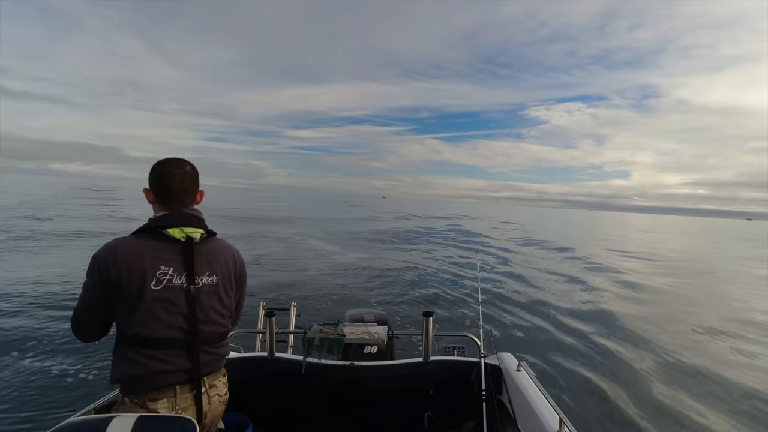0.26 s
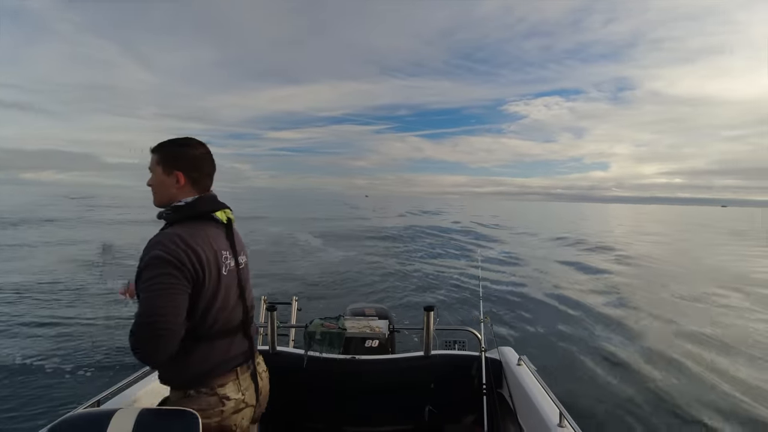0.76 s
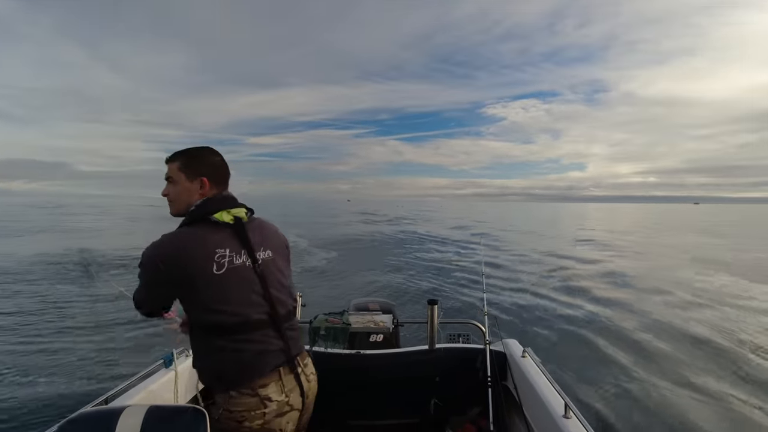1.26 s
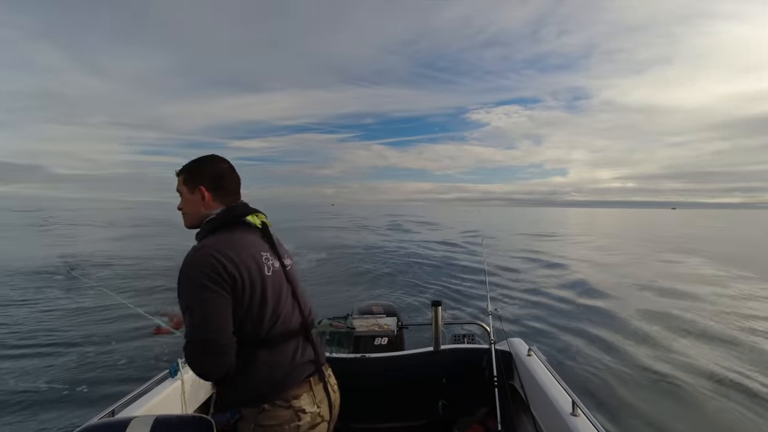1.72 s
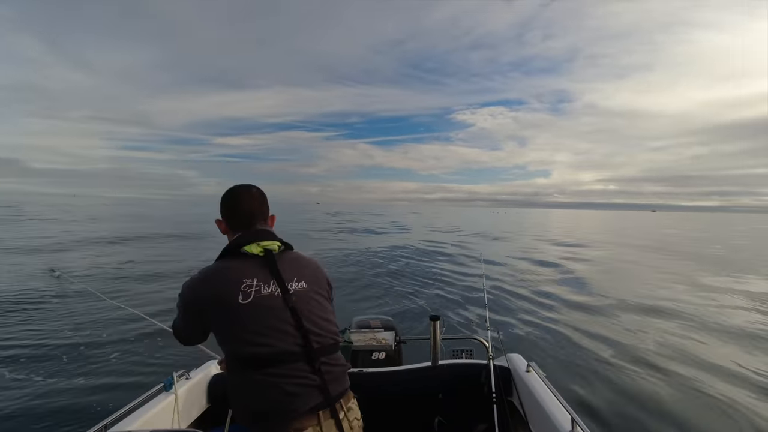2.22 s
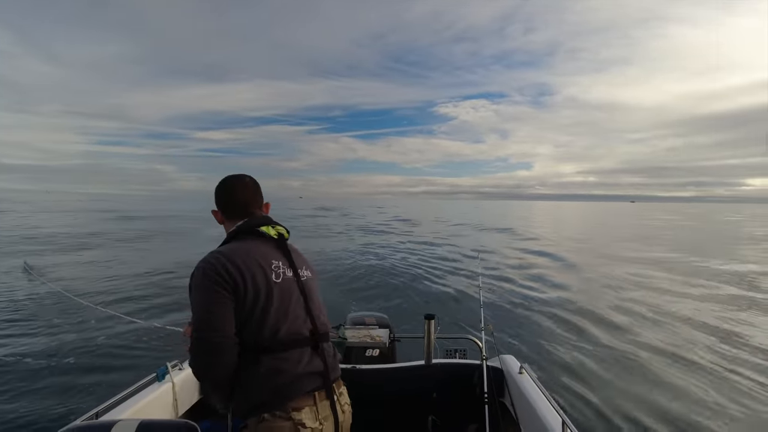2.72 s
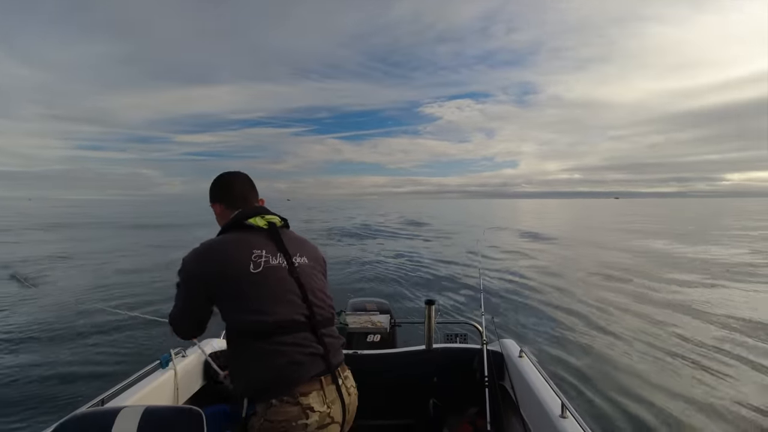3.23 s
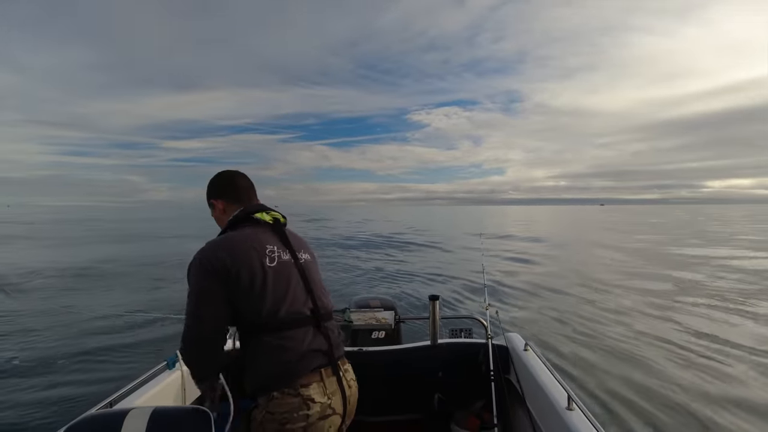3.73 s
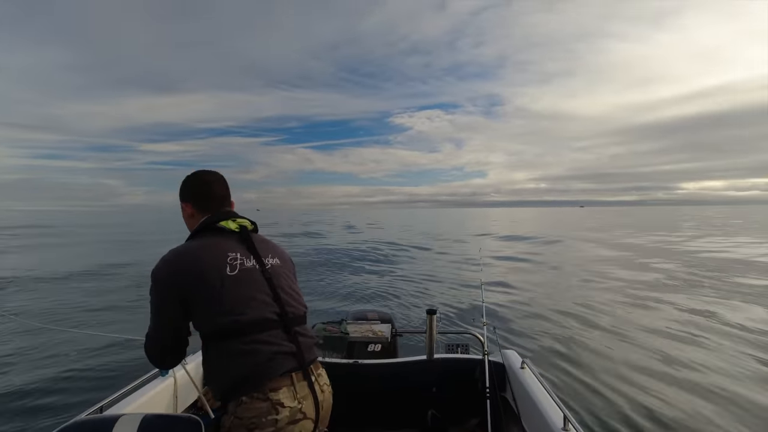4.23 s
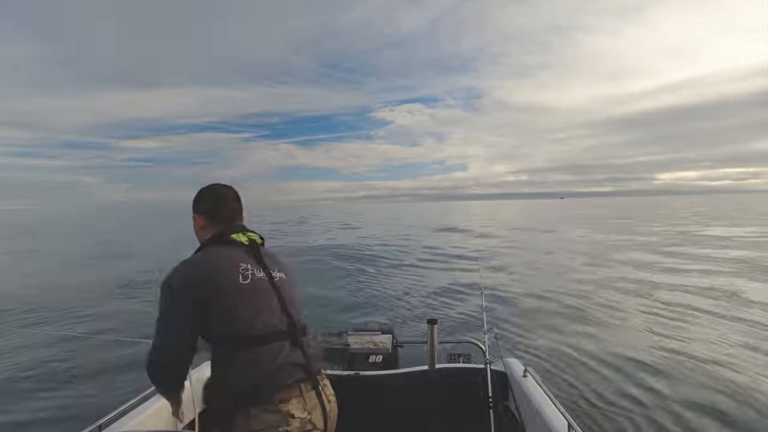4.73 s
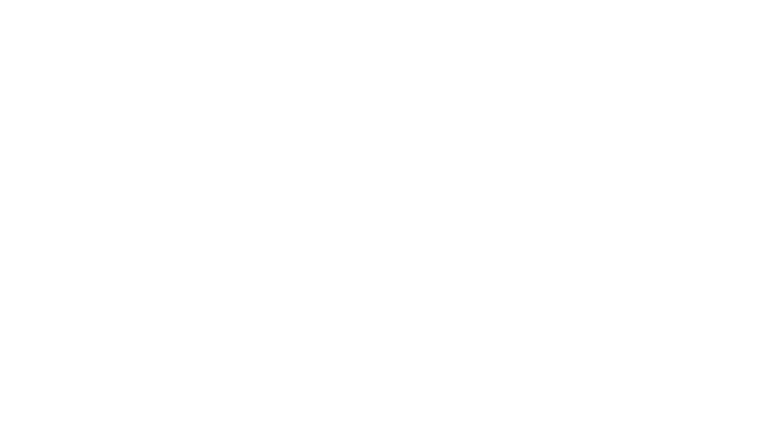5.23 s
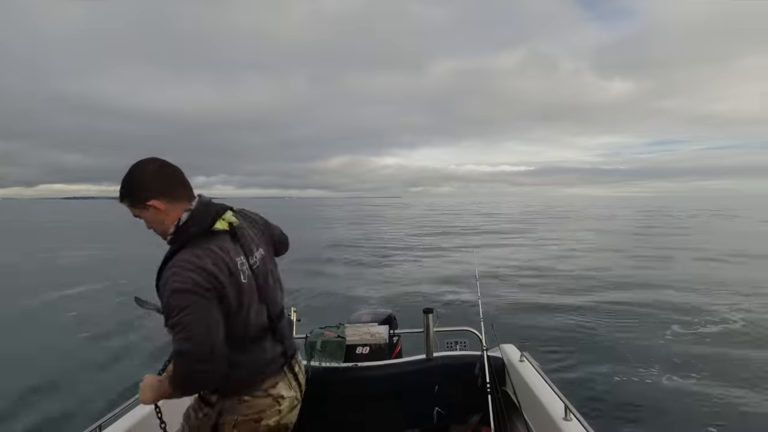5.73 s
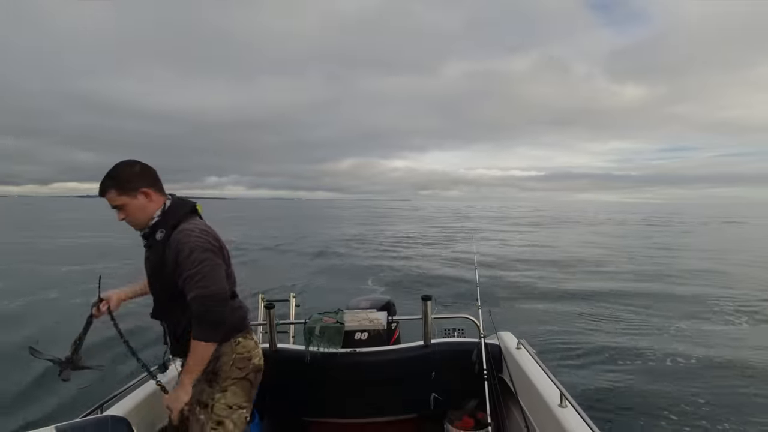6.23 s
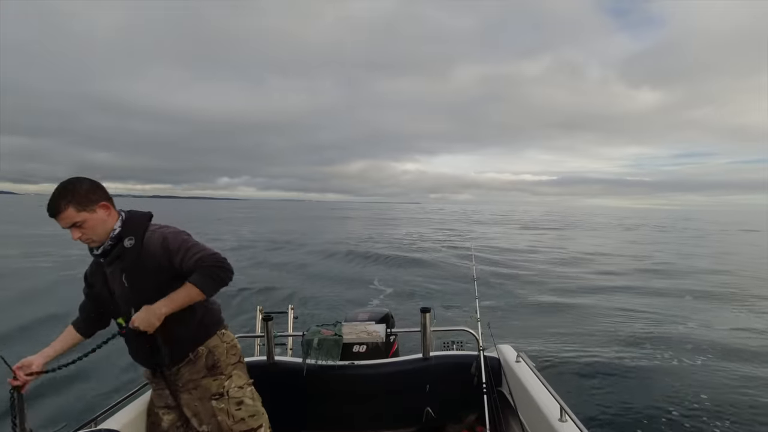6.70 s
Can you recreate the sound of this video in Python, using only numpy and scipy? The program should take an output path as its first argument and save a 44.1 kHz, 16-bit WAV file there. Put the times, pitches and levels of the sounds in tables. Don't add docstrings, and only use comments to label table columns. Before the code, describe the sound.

Hollow thumps of wet rope coils against a small boat's hull, then an anchor chain rattles, grinds and clinks over the gunwale on calm water.

```python
import sys
import numpy as np
from scipy import signal
from scipy.fft import rfft, irfft, next_fast_len
from scipy.io import wavfile
from scipy.ndimage import uniform_filter1d, map_coordinates

SR = 44100
rng = np.random.default_rng(int(sys.argv[2]) if len(sys.argv) > 2 else 0)


def invert_db(x):
    u = np.asarray(x, float) / 20
    return 10 ** u


def wrap_up_sound(samples):
    columns = np.atleast_2d(samples).T
    tamed = np.clip(columns, -1, 1)
    steps = np.round(tamed * 32767).astype(np.int16)
    wavfile.write(sys.argv[1], SR, steps)


N = 306936
SPAN = SR // 6
FIRST_CONTACT = 15.5

# pitch in Hz, level in dB, time to fall by 60 dB in seconds.
LINK_MODES = [
    [(2830, -10, .08), (3144, -3, .15), (3786, 0, .2), (4370, -4, .1)],
    [(5443, -10, .09), (5655, 0, .25)],
    [(6490, -3, .15), (6530, -2, .2)],
    [(8640, -8, .1), (8745, -1, .14), (9668, -5, .12), (9973, -3, .15), (10810, -5, .12), (11600, -6, .12)],
    [(13250, -6, .1), (13440, -1, .2), (13880, 0, .15), (14930, -5, .1), (15250, -10, .08)],
]

# pitch in Hz, width in Hz, level in dB.
GUNWALE_PEAKS = [(383, 44, -4), (689, 10, 1), (852, 44, -2.5), (975, 40, -3.5), (1205, 23, -1.5),
                 (1340, 25, -6.5), (1460, 25, -1.5), (1708, 39, -1.5), (1897, 50, -2.5), (2263, 68, -9.5),
                 (2450, 80, -9), (2790, 87, -11)]


def unit(x):
    return x / np.sqrt(np.mean(x ** 2) + 1e-20)


def level_curve(rows):
    s, db = np.transpose(rows)
    return np.interp(np.arange(N) / SR, s, db, left=-120)


def wobble(rate):
    knots = rng.standard_normal(int(N * rate / SR) + 4)
    return map_coordinates(knots, [np.arange(N) * rate / SR])


def shaped(x, response):
    m = next_fast_len(len(x) + 2048)
    return irfft(rfft(x, m) * response(np.fft.rfftfreq(m, 1 / SR)), m)[:len(x)]


def colour(points):
    f, db = np.transpose(points)
    return lambda hz: invert_db(np.interp(np.log(hz + 1), np.log(f), db))


def band(centre_hz, width_hz):
    return lambda f: 1j * f * width_hz / (centre_hz ** 2 - f * f + 1j * f * width_hz)


def steep(centre_hz, width_hz):
    top = centre_hz + width_hz / 2

    def response(f):
        lowpass = top * top / (top * top - f * f + np.sqrt(2) * 1j * f * top)
        return (band(centre_hz, width_hz)(f) * lowpass) ** 2
    return response


def grit(rate, spread_db):
    return unit(rng.standard_normal(N) * invert_db(spread_db * wobble(rate)))


def burst(t60, rise):
    t = np.arange(SPAN) / SR
    contact_db = 3 * rng.standard_normal(SPAN // 90 + 1)
    lumps = invert_db(np.repeat(contact_db, 90)[:SPAN])
    fade = invert_db(-60 * (t / max(t60, .004)) ** 1.477)
    return lumps * rng.standard_normal(SPAN) * fade * (1 - np.exp(-t / rise))


def puff(t60, rise, response, strike=0):
    blow = burst(t60, rise)
    blow[SR // 1000] += strike
    x = shaped(blow, response)
    return x / np.abs(x).max()


def ring(hz, db, t60, rise, chatter_db):
    t = np.arange(SPAN) / SR
    phase = rng.uniform(0, 2 * np.pi, len(hz))[:, None]
    knots = rng.standard_normal((len(hz), SPAN // 300 + 2))
    waver = uniform_filter1d(np.repeat(knots, 300, axis=1), 200, axis=1)[:, :SPAN]
    level = invert_db(db[:, None] - 60 * t / t60[:, None] + chatter_db * waver)
    tones = level * np.sin(2 * np.pi * hz[:, None] * t + phase)
    return tones.sum(0) * (1 - np.exp(-t / rise))


def add(track, s, sound):
    track[round(s * SR):][:len(sound)] += sound


def lapping_sea():
    # pitch in Hz, level in dB.
    sea_colour = [(15, -3.5), (25, 5.5), (104, -9.5), (144, -6.5), (241, -8), (291, -16.5), (381, -11),
                  (709, -15), (1280, -21.5), (1550, -22), (1730, -23.5), (8710, -41.5), (15800, -47)]
    cells = signal.stft(rng.standard_normal(N), nperseg=512)[2]
    patches = uniform_filter1d(uniform_filter1d(rng.standard_normal(cells.shape), 8, 0), 6, 1)
    lap = signal.istft(cells * invert_db(1.7 * unit(patches)), nperseg=512)[1][:N]
    return invert_db(-51 + .9 * wobble(3)) * unit(shaped(lap, colour(sea_colour)))


def outboard():
    # pitch in Hz, width in Hz, level in dB.
    hums = [(99.87, 1.46, -58.5), (204, 19, -82), (293.2, 5, -60.5), (460, 54, -66.5), (514, 4.9, -70.5)]

    def response(f):
        return sum(invert_db(db) * band(hz, w)(f) * np.sqrt(SR / np.pi / w) for hz, w, db in hums)
    return shaped(rng.standard_normal(N), response)


def sway_and_shudder():
    # time in seconds, sway in dB, length of the swing in seconds, shudder in dB.
    jolt_rows = [
        (1.052, -31.5, .2, -48),
        (1.27, -36.5, .1, -37.5),
        (1.403, -41.5, .17, -51),
        (2.69, -47, .1, -74),
        (3.14, -48, .2, -57),
        (5.375, -31, .6, -34.5),
        (6.004, -32.5, .2, -32),
        (6.226, -24.5, .7, -34.5),
        (6.365, -24, .2, -34.5),
        (6.578, -30, .3, -34.5),
    ]
    s, sway_db, lasts, shudder_db = np.transpose(jolt_rows)[:, :, None]
    t = np.arange(N) / SR - s
    sag_db = 9.5 * np.abs(t) + 144 * np.clip(t - lasts, 0, None)
    swing = (invert_db(sway_db - sag_db) * np.clip(t / 0.04 + 1, 0, 1)).max(0)
    sway = np.sqrt(2) * swing * np.sin(2 * np.pi * 10.45 * np.arange(N) / SR)
    shake = invert_db(-59) + (invert_db(shudder_db) * np.exp(-.5 * (t / 0.026) ** 2)).sum(0)
    return sway + shake * unit(shaped(rng.standard_normal(N), steep(31.8, 43)))


def rope():
    # middle in seconds, level in dB, half length in seconds, centre in Hz.
    strokes = [(0.517, -46.5, 0.022, 2720), (0.519, -44.5, 0.02, 920), (0.719, -46, 0.022, 1950),
               (1.148, -55, 0.013, 2780), (1.196, -75, 0.013, 2580), (1.47, -59.5, 0.0052, 2600),
               (1.576, -52.5, 0.029, 3270), (2.097, -55.5, 0.031, 2700), (2.221, -53, 0.0056, 1650),
               (2.366, -66, 0.012, 2980), (2.949, -58.5, 0.023, 2270), (3.3, -59.5, 0.22, 2260),
               (3.878, -62, 0.02, 3220), (4.103, -58.5, 0.021, 2800), (4.242, -59, 0.012, 2370),
               (4.507, -58.5, 0.011, 2550), (5.155, -52.5, 0.039, 1130), (5.313, -53, 0.013, 2560),
               (5.407, -45, 0.02, 1680), (5.725, -52, 0.01, 5430), (5.988, -43, 0.011, 1190),
               (6.056, -51, 0.031, 1530), (4.932, -58, 0.017, 2480), (5.5, -59.5, 0.04, 2300),
               (5.63, -71.5, 0.019, 975), (5.905, -66, 0.13, 7000), (6.365, -54, 0.17, 4050),
               (1.211, -42.5, 0.013, 1470)]
    out = np.zeros(N + SPAN)
    half_span_s = SPAN / SR / 2
    t = np.arange(SPAN) / SR - half_span_s
    grains = grit(250, spread_db=1.5)
    for s, db, half_s, hz in strokes:
        soft = lambda f: band(hz, 1.2 * hz)(f) / (1 + (f / (1.1 * hz)) ** 3)
        cloth = unit(shaped(grains[round(s * SR):][:SPAN], soft))
        add(out, max(s - half_span_s, 0), invert_db(db) * cloth * np.exp(-.5 * (t / half_s) ** 2))
    return out[:N]


def brushed_rail():
    # pitch in Hz, level in dB, time to fall by 60 dB in seconds.
    rail_tones = [(297, -58, 3), (710.6, -58.5, 9), (838, -62, 9), (866, -65, 5), (1427, -65, 4)]
    t = np.clip(np.arange(N) / SR - 3.16, 0, None)
    hum = np.zeros(N)
    for hz, db, t60 in rail_tones:
        hum += invert_db(db + 2.2 * wobble(20) - 60 * t / t60) * np.sin(2 * np.pi * hz * t)
    return hum * (1 - np.exp(-t / 0.0049))


def ribs_and_fittings():
    # start in seconds, peak in dB, pitch in Hz.
    rib_rows = [(0.5, -44.5, 1056), (0.69, -33, 1170), (1.199, -37.5, 1580), (1.2, -48, 3300),
                (1.218, -40, 1600), (1.707, -35.5, 594), (2.385, -38, 1004), (2.702, -34, 1200),
                (2.702, -30, 950), (3.036, -35, 934), (3.113, -38.5, 880), (3.963, -38, 1050),
                (0.7, -29, 298), (6.275, -36, 2920), (6.32, -40, 2900), (5.447, -35, 955),
                (5.99, -39, 1600), (6.034, -38, 1480), (6.046, -36.5, 1650), (6.065, -41, 1480)]
    out = np.zeros(N + SPAN)
    for s, db, hz in rib_rows:
        add(out, s, invert_db(db) * puff(0.044, 0.0018, steep(hz, 0.17 * hz), FIRST_CONTACT))
    return out[:N]


def panel_tone(hz):
    after = np.arange(SPAN) / SR / .007
    swell = after * np.exp(1 - after)
    turn = 2 * np.pi * np.cumsum(1 + .08 * (1 - after) / (1 + after)) / SR
    undertone = .6 * np.sin(.6 * hz * turn + 6 * rng.random())
    return swell * (np.sin(hz * turn) + undertone)


def thumps():
    # pitch in Hz, level in dB, time to fall by 60 dB in seconds.
    boom_modes = [(99.3, -3, 0.33), (128.5, 1.5, 0.22), (174, -6.5, 0.059)]
    # start in seconds, peak in dB, boom in dB, hardness in dB,
    # lowest boom tone over the others in dB.
    floor_drops = [(0.409, -42.5, 8.5, -23, -2), (0.471, -39.5, -17, -8, -7),
                   (0.688, -20.5, -0.5, -13.5, -6.5), (0.74, -31.5, -1, -18, -5), (0.916, -47, 7, -10, 2),
                   (1.131, -33.5, 5, -10.5, 17.5), (1.174, -44, 12.5, -13.5, 23.5),
                   (1.259, -42, 9, -18, 10), (1.76, -40, -25, -25, -2), (2.137, -38, -21, -17, 2),
                   (3.034, -19.5, -4.5, -4, -9), (3.112, -26, -1, -10.5, -2), (4.259, -40.5, -9, -8.5, -8),
                   (4.837, -33.5, -7, -12.5, -1), (5.713, -37.5, -0.5, -3.5, 3), (5.949, -32, 3, -7, 10),
                   (5.998, -27, 0.5, -9.5, 2.5), (6.05, -42.5, 13.5, -10, 0.5)]
    # start in seconds, peak in dB, boom in dB, hardness in dB, panel in Hz.
    side_slaps = [(0.022, -29.5, -25, -28, 458), (0.057, -30.5, -18, -20, 473), (0.072, -40, -25, -36, 466),
                  (0.075, -33.5, -26, -36, 174), (0.099, -39, -22, -36, 185), (0.652, -39.5, -7, -30, 464),
                  (1.199, -14.5, -28, -25, 525), (1.213, -18.5, -24, -13.5, 680),
                  (1.219, -21.5, -20, -18, 547), (1.225, -22.5, -24, -15, 480), (1.249, -33, -25, -14, 500),
                  (1.535, -33, -5, -7.5, 515), (1.595, -37, -6, 1, 410), (1.705, -35, -32, -11.5, 577),
                  (2.377, -35.5, -34, -0.5, 775), (2.401, -28, -20, -14, 616),
                  (2.474, -26.5, -14, -25, 511), (2.486, -25, -13, -44, 468), (2.54, -42, -20, -26, 413),
                  (2.506, -34, -20, -32, 588), (2.7, -25.5, -4, -4.5, 560), (3.834, -34, -4, -5.5, 460),
                  (3.961, -15, -3, -6, 545), (4.78, -37, -7.5, -8, 600), (4.797, -32.5, -11, -9, 604),
                  (4.812, -36, -6, -9.5, 560), (5.243, -36.5, -4, -11.5, 375),
                  (5.301, -33.5, -1.5, -12, 474), (5.364, -36, -12, -9, 430), (5.389, -28.5, -6, -7, 460),
                  (5.446, -37, -24, -12, 505), (6.856, -25, -3.5, 2.5, 420)]
    out = np.zeros(N + SPAN)
    boom_hz, boom_db, boom_t60 = np.transpose(boom_modes)
    blows = [(*row, 232) for row in floor_drops]
    blows += [(*row[:-1], 1.5, row[-1]) for row in side_slaps]
    for s, db, low_db, hard_db, deep_db, hz in blows:
        slap = np.clip(1 + .024 * hard_db, .3, 1)
        lean_db = deep_db * np.array([.5, -.5, -.5])
        detuned_hz = boom_hz * rng.normal(1, 0.0071, len(boom_hz))
        boom = ring(detuned_hz, boom_db + lean_db + low_db - 4, boom_t60, rise=0.0079, chatter_db=4.0)

        def panel_response(f):
            broad = steep(380, 750)(f) * (slap + 0.16 * band(296, 50)(f))
            return broad + 0.8 * steep(hz, 110)(f)
        panel = slap * puff(0.17 * (0.33 + .7 * slap), 0.0008, panel_response, FIRST_CONTACT)
        panel = panel + .9 * (1 - slap) * panel_tone(hz)
        ribs = invert_db(hard_db) * puff(0.13, 0.0015, steep(930, 540), FIRST_CONTACT)
        edge = invert_db(hard_db - 14.5) * puff(0.1, 0.0011, steep(2490, 1800))
        add(out, s - .001, invert_db(db) * (boom + panel + ribs + edge))
    return out[:N]


def gunwale(seat_db, stretch):
    # pitch in Hz, level in dB.
    shell_colour = [(150, -48), (250, -11), (408, 10), (517, -13), (843, 13), (1110, -17), (1770, -34),
                    (2190, -29), (5000, -47), (6500, -66), (11000, -120)]

    def peaks(f):
        total, side = 0.17, 1
        for (hz, width, db), more_db in zip(GUNWALE_PEAKS, seat_db):
            total = total + side * invert_db(db - 4 + more_db) * band(hz * stretch, width + 15)(f)
            side = -side
        return total

    def response(f):
        body = colour(shell_colour)(f) ** 0.096 * steep(1400, 3000)(f) * peaks(f)
        return body + 0.086 * steep(180, 200)(f)
    return response


def chain_drag():
    # time in seconds, level in dB.
    drag = [
        (5.2, -69),
        (5.694, -55.5),
        (5.94, -43.5),
        (6.228, -48.5),
        (6.41, -48),
        (6.468, -31.5),
        (6.6, -27.5),
        (6.714, -31.5),
        (6.846, -37),
        (6.96, -37),
    ]
    shell = gunwale(np.zeros(len(GUNWALE_PEAKS)), 0.88)
    return invert_db(level_curve(drag) - 5.5) * unit(shaped(grit(200, spread_db=1.5), shell))


def chain_knocks():
    # start in seconds, peak in dB, bright edge in dB.
    bumps = [(5.292, -46, -10), (5.583, -36, -13.5), (5.626, -46, -28), (5.645, -51, -30),
             (5.775, -32.5, 0.5), (5.816, -22, -20), (5.83, -25, -28), (5.841, -26, -27),
             (5.863, -30.5, -33), (5.918, -22, -25), (5.933, -32.5, -18), (5.952, -33, -15),
             (5.991, -32.5, -25), (6.034, -39.5, -13), (6.048, -38, -16), (6.073, -44, -20),
             (6.158, -38, -30), (6.176, -26, -15.5), (6.193, -29.5, -20), (6.217, -19.5, -7.5),
             (6.243, -24.5, -10), (6.415, -14.5, -11.5), (6.43, -22.5, -15), (6.456, -14.5, -16),
             (6.466, -16, -22), (6.476, -29, -25), (6.495, -15, -11.5), (6.504, -18, -28),
             (6.521, -12.5, -14.5), (6.528, -19, -16), (6.536, -18, -22), (6.545, -18.5, -3.5),
             (6.552, -17.5, -9), (6.561, -22, -27), (6.57, -12, -22), (6.584, -18.5, -10.5),
             (6.593, -33, -25), (6.608, -14.5, -14.5), (6.616, -20, -22), (6.623, -16, -22),
             (6.632, -28, -22), (6.659, -18, -23), (6.679, -25, -9.5), (6.692, -16.5, -13.5),
             (6.7, -21.5, -26), (6.715, -40, -22), (6.73, -14.5, -12), (6.738, -16.5, -28),
             (6.76, -18.5, -14), (6.773, -18.5, -17), (6.784, -14, -19), (6.793, -18.5, -26),
             (6.799, -13, -22), (6.804, -22.5, -20), (6.811, -15, -21), (6.836, -25, -25),
             (6.845, -23, -28), (6.859, -27, -27), (6.884, -32, -25), (6.901, -36.5, -25)]
    out = np.zeros(N + SPAN)
    for s, db, edge_db in bumps:
        shell = gunwale(4 * rng.standard_normal(len(GUNWALE_PEAKS)), rng.normal(1, .015))
        edge = invert_db(edge_db + 7.5) * puff(0.076, 0.00037, steep(2220, 6240), strike=10)
        body = puff(0.07, 0.00042, shell, strike=24)
        add(out, s - .001, invert_db(db - 2.0) * (body + edge))
    return out[:N]


def snaps_and_ticks():
    # start in seconds, peak in dB, centre in Hz.
    snap_rows = [(2.7, -50, 4310), (3.034, -41.5, 4800), (3.9607, -40.5, 5250), (5.1162, -39, 6100),
                 (5.776, -28.5, 8540), (6.217, -31, 5000), (6.2718, -24.5, 5500), (6.3155, -28, 5000),
                 (6.4345, -25, 10200), (6.5772, -24, 8650), (6.7593, -32, 6000), (6.832, -29, 10100)]
    # start in seconds, peak in dB, centre in Hz.
    tick_rows = [(0.1206, -47, 4070), (0.317, -52, 4100), (1.322, -53.5, 5200), (2.0825, -39.5, 6260),
                 (2.091, -52, 7500), (2.097, -49, 7900), (2.107, -49, 7500), (4.773, -49, 10000),
                 (4.8353, -44, 4140), (5.019, -47, 3100), (5.1187, -45, 7000), (5.307, -34.5, 2500),
                 (5.583, -37, 2000)]
    out = np.zeros(N + SPAN)
    for s, db, hz in snap_rows:
        add(out, s, invert_db(db - 3.5) * puff(.04, 0.0001, steep(hz, 2.0 * hz)))
    for s, db, hz in tick_rows:
        add(out, s, invert_db(db) * puff(0.0093, 0.0001, steep(hz, 0.9 * hz)))
    return out[:N]


def loose_jingle():
    # time in seconds, level in dB.
    jingle = [
        (6.272, -50),
        (6.384, -59),
        (6.62, -62),
        (6.828, -47),
        (6.96, -39.5),
    ]
    hz, level_db, _ = np.transpose(sum(LINK_MODES, []))

    def steel(f):
        modes = sum(invert_db(db) * band(c, 45)(f) for c, db in zip(hz, level_db))
        return 0.2 * steep(9000, 12000)(f) + modes
    return invert_db(level_curve(jingle) + 3.5) * unit(shaped(grit(90, spread_db=3), steel))


def hanging_links():
    # start in seconds, level in dB near 3.1, 3.8 and 4.4 kHz, time to fall by 60 dB in seconds.
    free_rings = [
        (6.578, -50, -55, -32, 0.09),
        (6.842, -45, -60, -40, .15),
        (6.854, -54, -62, -36, 0.16),
        (6.864, -47, -37, -37, 0.19),
        (6.883, -52, -50, -42, .08),
        (6.932, -39, -55, -44, .15),
        (6.937, -45, -58, -31, .06),
        (6.951, -42, -44, -45, .12),
    ]
    out = np.zeros(N + SPAN)
    hz = np.transpose(sum(LINK_MODES, []))[0][1:4]
    for s, *db, t60 in free_rings:
        add(out, s, ring(hz, np.array(db), np.full(3, t60), rise=0.001, chatter_db=0.0))
    return out[:N]


def clinks():
    # start in seconds, peak in dB, level in dB of the fifth and of the sixth family.
    contacts = [(5.0614, -48, -24, -10), (5.1177, -59, -11, -15), (5.7184, -39, -25, -13),
                (5.7209, -37.5, -15.5, -24), (6.205, -47, -15, 8), (6.271, -26.5, -13.5, -2),
                (6.316, -35, -10, -10), (6.3335, -47.5, -19, 13), (6.4343, -23, -17, -5.5),
                (6.5782, -22, -8, -13), (6.5874, -25, -11, -3), (6.6034, -31, -20, -20),
                (6.6274, -39.5, -16, -7), (6.6544, -46, -9, 3), (6.683, -38, -11, -7),
                (6.7127, -43, -14, -10), (6.7489, -31.5, -21, -4), (6.762, -25.5, -13, -7),
                (6.8077, -37.5, -7, 3.5), (6.8322, -24, -8, -11), (6.843, -27, -13, -14),
                (6.85, -23, -9, -7), (6.8643, -18, -28, -17), (6.8834, -34, -4, -9), (6.8982, -27.5, 1, -7),
                (6.922, -24, 1, -17), (6.9356, -26, 2, -16), (6.9436, -16.5, -11, 0)]
    touches = [5.11, 5.776, 6.218, 6.315, 6.41, 6.468, 6.606, 6.645, 6.678, 6.745, 6.83, 6.915]
    out, t = np.zeros(N + SPAN), np.arange(SPAN) / SR
    hz, level_db, t60 = np.transpose(sum(LINK_MODES, []))
    family_sizes = [len(family) for family in LINK_MODES]
    stops = np.array(touches + [N / SR])
    for s, db, fifth_db, sixth_db in contacts:
        top_db = -12.5 + 0.27 * (db + 35.5)
        tone_db = np.repeat([-17.5, fifth_db + 3, sixth_db, -3, top_db], family_sizes)
        luck = rng.standard_normal((3, len(hz)))
        sound = ring(hz * (1 + .002 * luck[0]), level_db + tone_db + 4.5 * luck[1],
                     0.94 * t60 * np.exp(0.096 * luck[2]), rise=0.00076, chatter_db=3)
        choke_s = stops[stops > s + .01].min() - s
        choked = invert_db(-12 * np.clip((t - choke_s) / 0.0078, 0, 1))
        add(out, s, invert_db(db - 7.5) * sound * choked)
    return out[:N]


def scene():
    background = lapping_sea() + outboard() + sway_and_shudder()
    rope_and_hull = rope() + brushed_rail() + ribs_and_fittings() + thumps()
    chain = chain_drag() + chain_knocks() + snaps_and_ticks() + loose_jingle() + hanging_links() + clinks()
    return (background + rope_and_hull + chain)[None]


def low_pass(x):
    return signal.sosfilt(signal.butter(12, 15920, fs=SR, output="sos"), x)


def record(dry):
    mic = shaped(dry[0], lambda f: (f < 15850) / (1 + (f / 15000) ** 8))
    return low_pass(mic[None])


dry = scene()
out = record(dry)
wrap_up_sound(out)
```